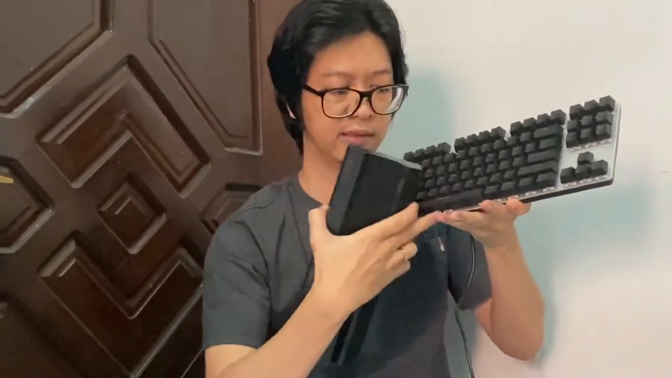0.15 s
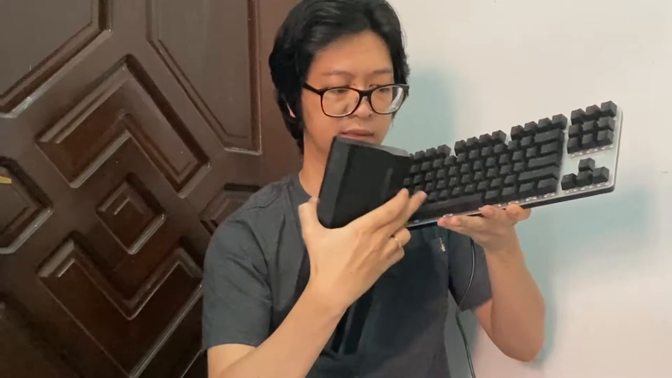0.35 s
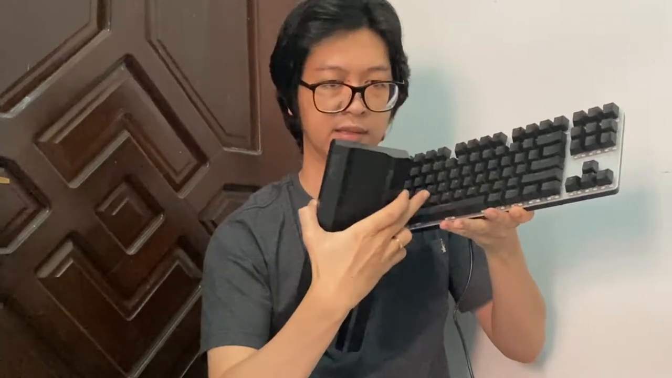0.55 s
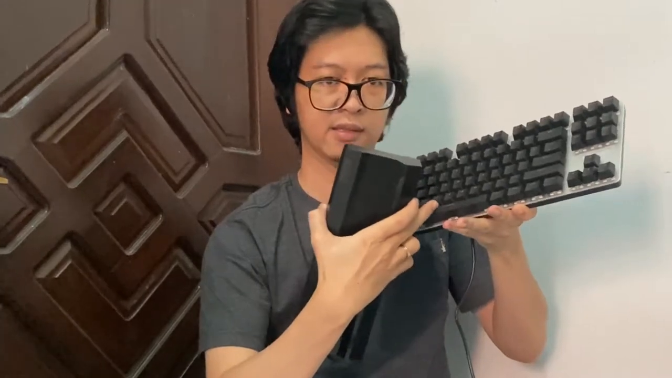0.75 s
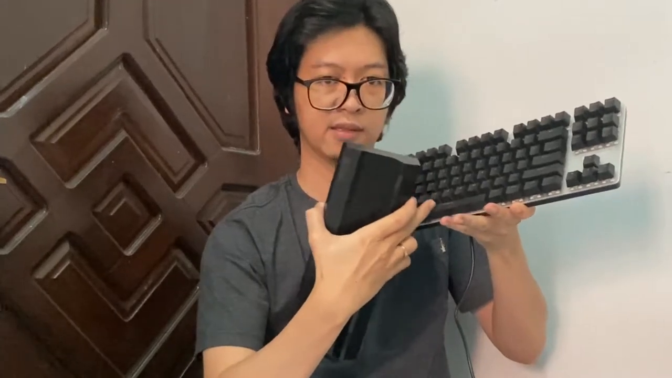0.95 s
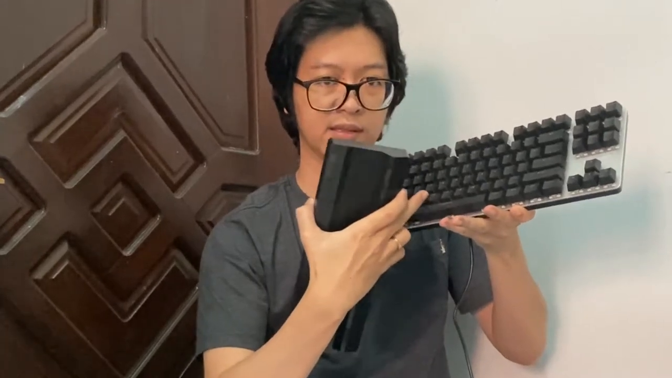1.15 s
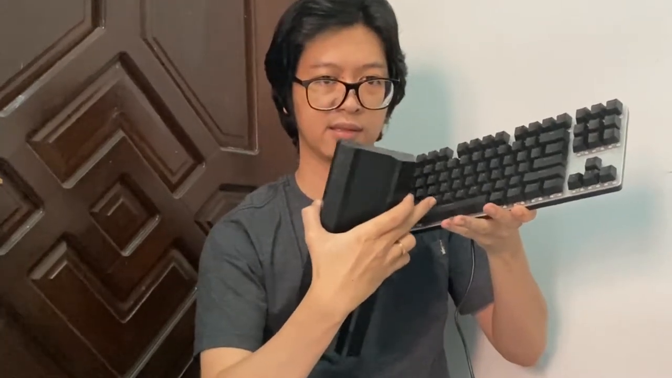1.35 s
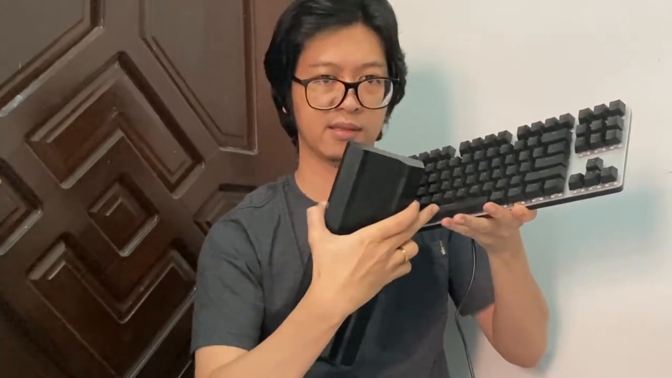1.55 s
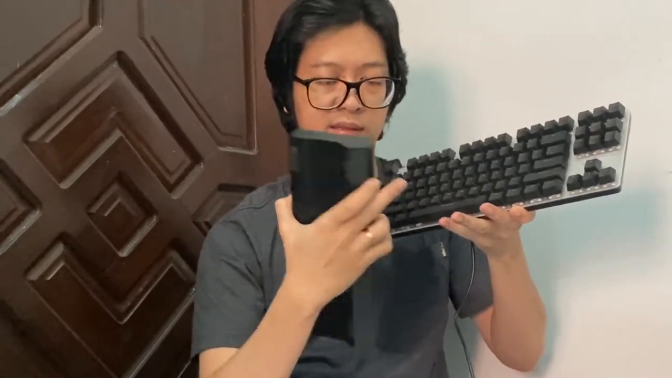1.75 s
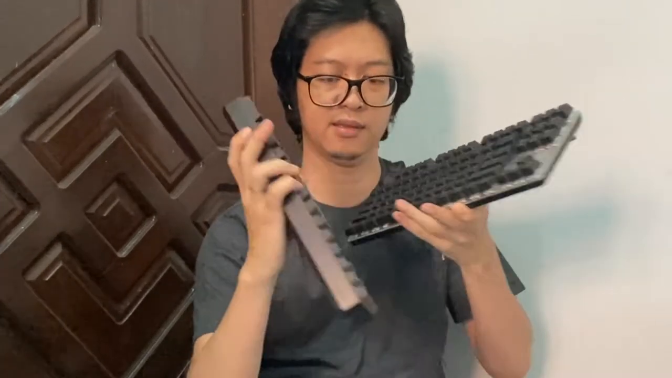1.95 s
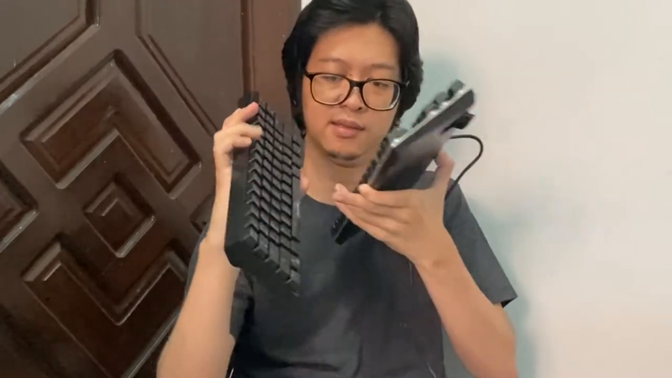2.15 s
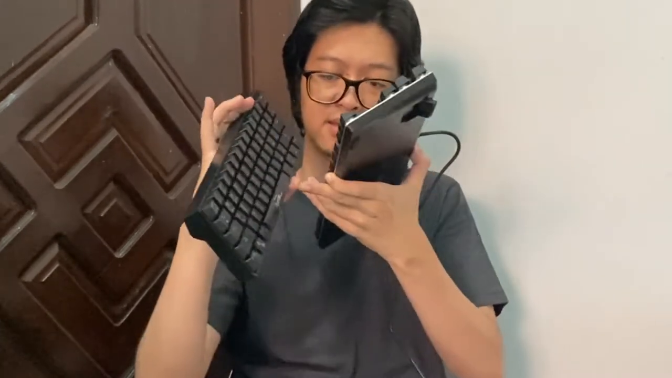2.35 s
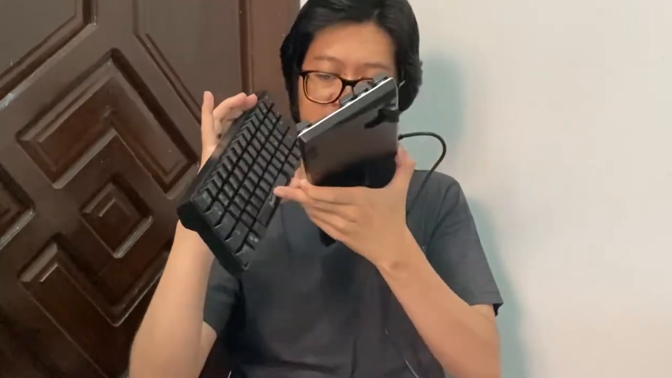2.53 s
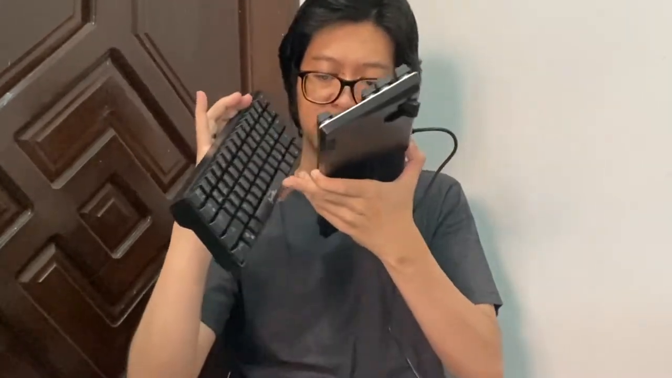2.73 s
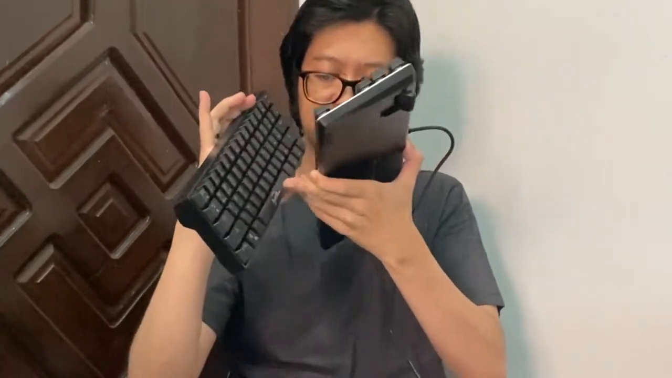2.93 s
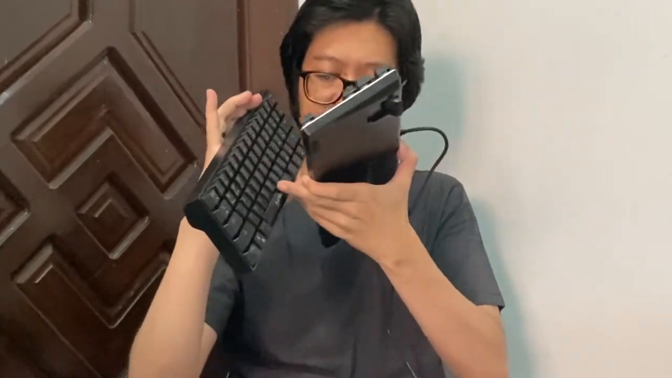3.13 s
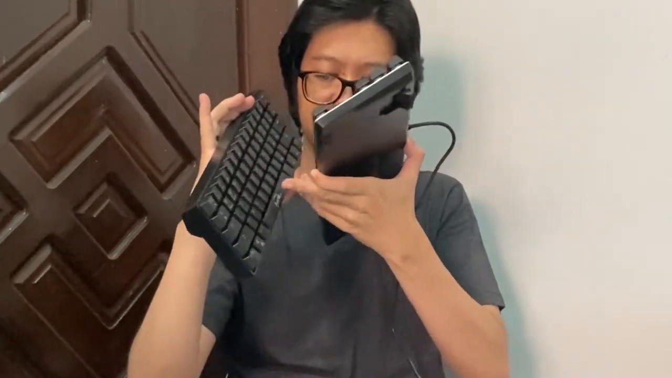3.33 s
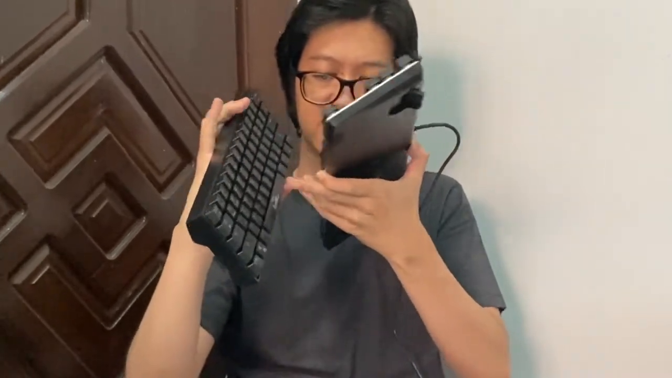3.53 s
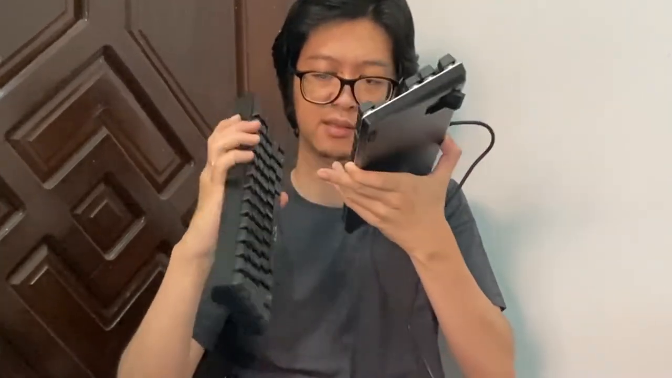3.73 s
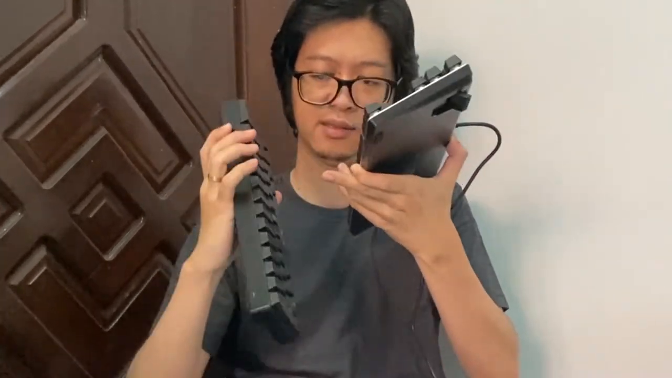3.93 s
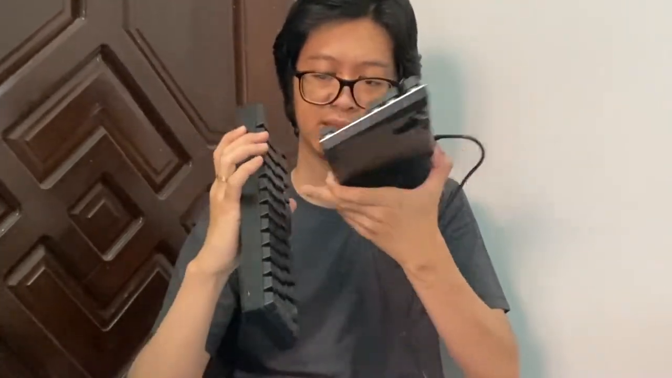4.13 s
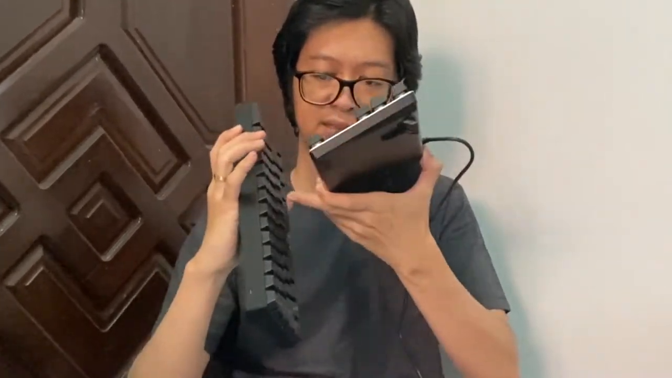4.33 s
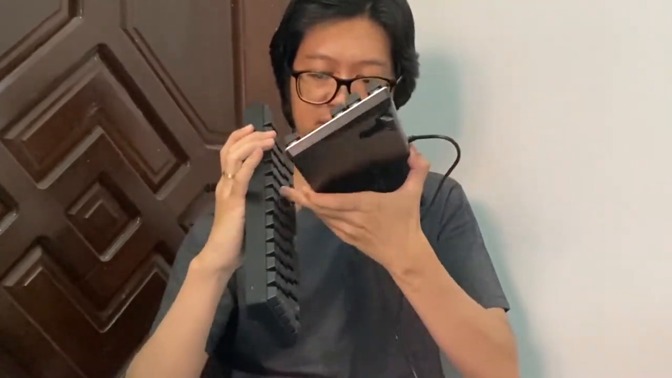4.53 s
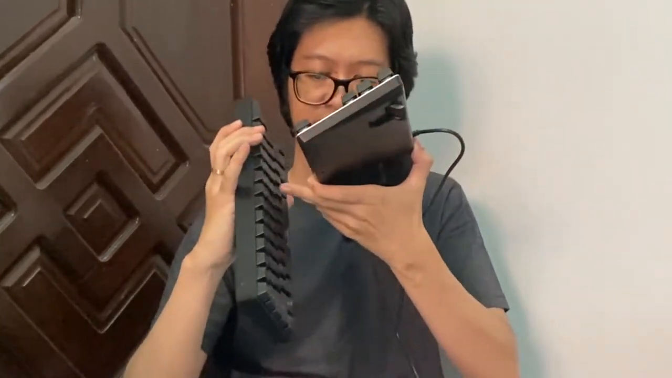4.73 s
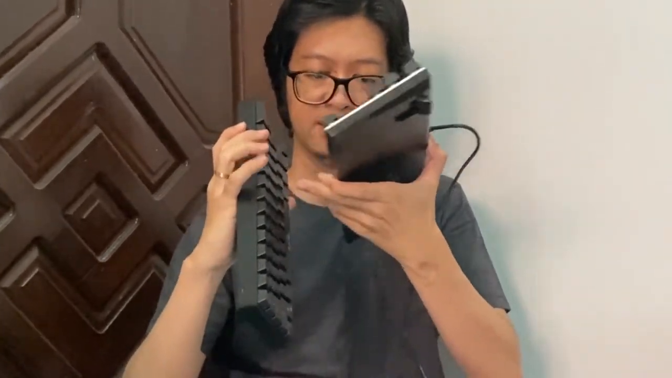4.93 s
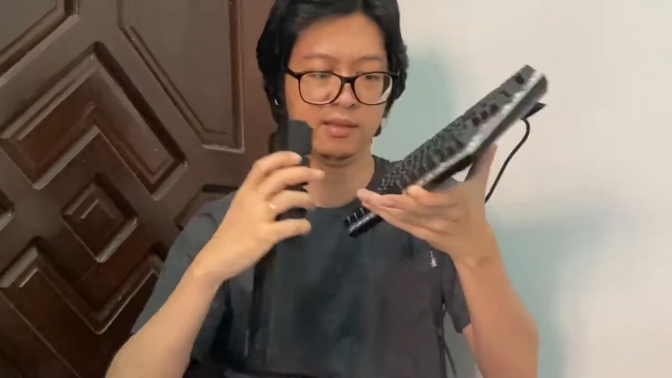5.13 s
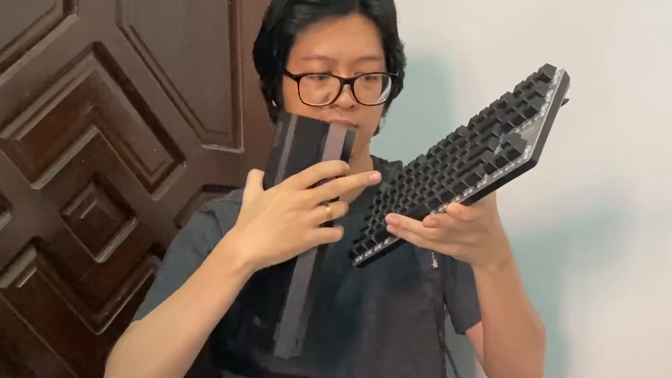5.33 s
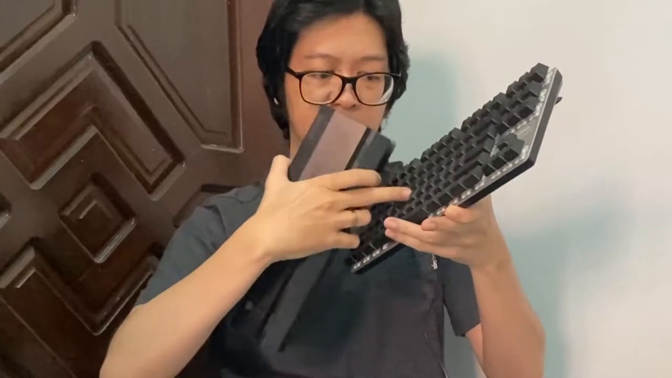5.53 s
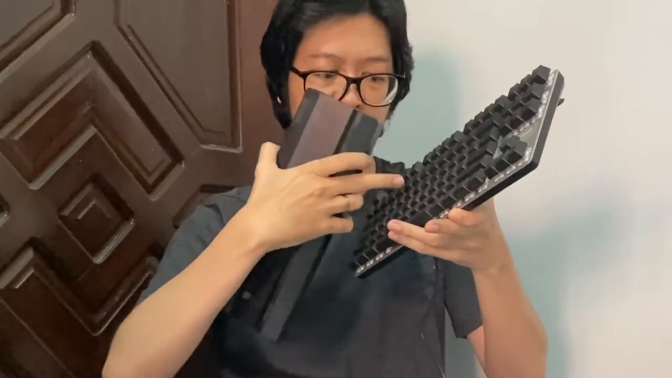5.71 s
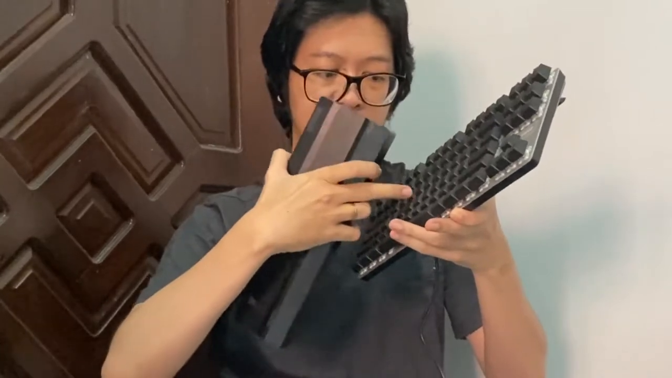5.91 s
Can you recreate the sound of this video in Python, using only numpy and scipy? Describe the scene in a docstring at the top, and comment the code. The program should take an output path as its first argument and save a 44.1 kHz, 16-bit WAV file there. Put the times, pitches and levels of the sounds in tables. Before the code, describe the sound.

Two mechanical keyboards are tried in turn, held near a stereo microphone in a small hard-walled room. Bright, sharp clicks come first at a steady pace, then clicks of a woodier, heavier colour, then a return to another grip with further clacks and light handling bumps. Every press has a down-click and a softer up-clack. Quiet hiss lies behind, and a low wavering hum swells in the second half.

```python
"""Two mechanical keyboards

Someone holds two mechanical keyboards in a small, hard-walled room and presses clicky keys, about three a second.
Each stroke is a faint keycap rattle, the snap of the switch and its landing, then a faint tick and a duller clack
as the key springs back: noise bursts and impulses filtered by case resonances, with plate tones, echoes and a tail.
Soft bumps and short tones come between, and a band-shaped dip glides up through the middle frequencies and back.
Behind lie filtered-noise hiss and a low, wavering hum that swells in the second half."""
import sys
import numpy as np
from scipy import signal
from scipy.fft import rfft, irfft
from scipy.io import wavfile
from scipy.ndimage import uniform_filter1d

SR = 44100
rng = np.random.default_rng(int(sys.argv[2]) if len(sys.argv) > 2 else 0)


def inscribe(sig):
    """Save sig as 16-bit PCM at rate SR to the path in sys.argv[1].

    A 1-D sig is mono; a 2-D sig holds one channel per row.
    Samples are clipped to [-1, 1] before scaling.
    """
    pcm = np.round(np.clip(np.atleast_2d(sig).T, -1, 1) * 32767)
    wavfile.write(sys.argv[1], SR, pcm.astype(np.int16))


N = 263277

# Thud, knock, clack and click bands of an impact: the heavy case answers later than the switch.
# Each row: upper edge in Hz (the last band is open), lag in seconds, decay in seconds before the blow's
# length factor, room level in dB.
BANDS = [(831, 0.00091, 0.004, -6.5), (2012, 0.00119, 0.0066, -9.5), (4970, 0.00038, 0.0041, -8),
         (20000, 0.0001162, 0.0054, -14)]


def gain_of(db):
    """Level law: 20 dB is a tenfold amplitude."""
    return 10 ** (np.asarray(db) / 20)


def evened(x):
    """Power normalisation: scales to an rms of one."""
    return x / np.sqrt(np.mean(x ** 2) + 1e-20)


def read(points, hz):
    """Interpolation along log frequency, the scale on which pitch is heard."""
    f, value = np.transpose(points)
    return np.interp(np.log(hz + 1), np.log(np.abs(f) + 1), value)


def follow(points):
    """Amplitude envelope: a level curve in dB becomes a gain for every sample."""
    return gain_of(np.interp(np.arange(N) / SR, *np.transpose(points)))


def smooth_noise(window):
    """Slow random fluctuation: white noise averaged twice over a window in samples, with an rms of one."""
    once = uniform_filter1d(rng.standard_normal(N), size=window)
    return evened(uniform_filter1d(once, size=window))


def add(mix, s, sound):
    """Superposition: sums a stereo sound into the mix at s seconds."""
    start = round(s * SR)
    part = mix[:, max(start, 0):]
    sound = sound[:, max(-start, 0):]
    part[:, :sound.shape[1]] += sound[:, :part.shape[1]]


def diffuse(size):
    """Diffuse-field coherence: spectra of white noise as two nearby microphones hear it."""
    # Likeness of the two channels. Each row: frequency in Hz, coherence from 0 to 1.
    likeness = [(60, 0.94), (250, 0.74), (600, 0.21), (1200, 0.087), (2500, 0.4), (5500, 0.59), (8500, 1),
                (15000, 0.35)]
    left, other = rfft(rng.standard_normal((2, size)))
    same = np.clip(read(likeness, np.fft.rfftfreq(size, 1 / SR)), -1, 1)
    right = same * left + np.sqrt(1 - same ** 2) * other
    return np.array([left, right])


def background(spectrum):
    """Spectral shaping: diffuse white noise filtered to the given colour, with an rms of one."""
    colour = gain_of(read(spectrum, np.fft.rfftfreq(N, 1 / SR)))
    return evened(irfft(diffuse(N) * colour, N))


def hiss(flutter_db=-2.0):
    """Coloured noise with random amplitude modulation: quiet room hiss, never quite steady."""
    # Colour of the hiss. Each row: frequency in Hz, level in dB.
    hiss_colour = [(25, -16.5), (50, -4), (100, 3), (200, -3), (400, -9), (800, -14), (1250, -13),
                   (2000, -19.5), (4000, -23), (8000, -27.5), (12000, -27), (16000, -40.5)]
    # Level of the hiss. Each row: time in seconds, level in dB.
    hiss_level = [(0, -54), (.2, -58.5), (1.9, -58.5), (2.25, -62), (2.6, -61), (4.1, -57), (5.97, -55)]
    flutter = gain_of(flutter_db * smooth_noise(2000))
    return follow(hiss_level) * flutter * background(hiss_colour)


def hum(hz=57, waver_hz=3.5, octave_db=-18, rumble_db=-7):
    """Frequency modulation: a low, randomly wavering tone with its octave, wrapped in noise rumble."""
    # Colour of the rumble. Each row: frequency in Hz, level in dB.
    rumble_colour = [(25, -24), (40, -6.5), (52, 6), (70, -5), (90, 4.5), (105, -8), (125, -10),
                     (160, -21.5), (260, -21.5), (500, -64)]
    # Level curve of the hum. Each row: time in seconds, level in dB before the scene's mix gain.
    hum_level = [(0.0, -41.5), (0.08, -59), (0.46, -50.5), (0.7, -72), (1.53, -77), (1.56, -52),
                 (1.71, -77.5), (2.74, -76), (2.81, -61), (3.27, -54), (3.57, -36), (3.62, -47),
                 (3.77, -36), (3.82, -57), (3.94, -44), (4.06, -51.5), (4.26, -32.5), (4.36, -41),
                 (4.46, -35.5), (5.19, -51), (5.4, -35.5), (5.55, -46.5), (5.92, -40), (5.97, -47)]
    angle = 2 * np.pi * np.cumsum(hz + waver_hz * smooth_noise(3000)) / SR
    tone = evened(np.sin(angle) + gain_of(octave_db) * np.sin(2 * angle))
    return evened(tone + gain_of(rumble_db) * background(rumble_colour)) * follow(hum_level)


def room_tail(spectrum, t, build_s=0.0032, clump_db=1.0):
    """Reverberation: clumped reflections build up quickly and die exponentially at each frequency's own rate."""
    # Room decay. Each row: frequency in Hz, time to fall by 60 dB in seconds.
    room_decay = [(250, 0.46), (500, 0.45), (800, 0.34), (1300, 0.34), (2500, 0.31), (6000, 0.35),
                  (15000, 0.26)]
    hz, at, z = signal.stft(irfft(spectrum), SR, nperseg=512)
    z = z * gain_of(-60 * np.maximum(at + t[0], 0) / read(room_decay, hz)[:, None])
    tail = signal.istft(z, SR, nperseg=512)[1][:, :len(t)]
    clumps = gain_of(clump_db * evened(uniform_filter1d(rng.standard_normal(len(t)), size=110)))
    build_up = 1 - np.exp(-np.maximum(t, 0) / build_s)
    return tail * evened(clumps) * build_up


def hollowed(x):
    """Time-varying filtering: a band-shaped dip glides up through the middle frequencies and back down."""
    # Path of the dip. Each row: time in seconds, centre in Hz, depth in dB (negative is a boost),
    # half-width in octaves.
    dip_path = [(1.15, 624, -8, 0.45), (1.42, 700, 12.5, 0.31), (1.7, 1160, -4, 0.53),
                (1.83, 1700, 33, 0.46), (1.96, 1710, 15, 0.27), (2.219, 2020, 18, 0.82),
                (2.42, 1690, 9, .33), (2.72, 650, 1, 0.18)]
    hz, t, z = signal.stft(x, SR, nperseg=512)
    s, *columns = np.transpose(dip_path)
    centre, depth, octaves = (np.interp(t, s, column) for column in columns)
    away = np.log2((hz[:, None] + 1) / centre) / octaves
    z = z * gain_of(-depth * np.exp(-away ** 4))
    return signal.istft(z, SR, nperseg=512)[1][:, :N]


def rings(swell_s=0.0043):
    """Damped modes: softly started, dying tones that ring after bumps and after one key release."""
    # Each row: start in seconds, frequency in Hz, level in dB, time to fall by 60 dB in seconds.
    ring_tones = [(0.093, 394, -32, 0.16), (.093, 2050, -31.5, 0.061), (0.131, 330, -27.5, 0.11),
                  (1.862, 1411, -24.5, 0.09), (1.862, 952, -31, 0.083), (2.413, 1320, -34, 0.07),
                  (2.437, 2920, -31, 0.044)]
    out = np.zeros((2, N))
    t = np.arange(SR // 2) / SR
    for s, hz, db, t60 in ring_tones:
        envelope = gain_of(db - 60 * t / t60) * (1 - np.exp(-t / swell_s))
        tone = envelope * np.sin(2 * np.pi * hz * t)
        add(out, s, np.array([tone, tone]))
    return out


def plate(modes, t, swell_s=0.0037):
    """Modal decay: long, dying sine tones of the switch plate, each at a random phase."""
    t = np.maximum(t, 0)
    tones = sum(gain_of(db - 60 * t / t60) * np.sin(2 * np.pi * (hz * t + rng.random()))
                for hz, db, t60 in modes)
    return np.array([tones, tones]) * (1 - np.exp(-t / swell_s))


def keycap(hz, ripple_db=3.5, spacing_hz=75):
    """Small local resonances: a random spectral ripple, drawn afresh for every blow."""
    knots = rng.standard_normal(1024)
    ripple = np.interp(hz / spacing_hz, np.arange(len(knots)), knots)
    return evened(gain_of(ripple_db * ripple))


def keyboard(colour, case, hz):
    """Resonant radiation: one keyboard's response, split into the four bands, each of unit power."""
    peaks = sum((gain_of(db) ** 2 - 1) / (1 + (2 * (hz - f) / width) ** 2) ** 2 for f, width, db in case)
    body = gain_of(read(colour, hz)) * np.sqrt(np.maximum(1 + peaks, 1e-3))
    body = body / np.sqrt(1 + (230 / (hz + 1)) ** 6)  # a small case radiates little bass
    below = [1 / (1 + (hz / band[0]) ** 12) for band in BANDS[:-1]]
    shares = np.diff([0 * hz, *below, 1 + 0 * hz], axis=0)  # power share of each band
    return np.array([evened(body * np.sqrt(np.abs(share))) for share in shares])


def contact(bands, levels, t, length, rise, snap=.75, spread=.45, size=4096):
    """Impact excitation: a sharp impulse amid brief plastic chatter; the treble comes first, the case follows."""
    coarse = bands[:, ::len(t) // size]  # the response on the short burst's frequency grid
    t = t[:size]
    hz = np.fft.rfftfreq(size, 1 / SR)
    chatter = rfft(rng.standard_normal(size)) + spread * diffuse(size)
    turn = rng.random()  # phase of the impulse, in turns
    out = np.zeros((2, size))
    for band, db, (_, lag, decay, _) in zip(coarse, levels, BANDS):
        u = (t - lag) / (decay * length)
        shape = np.exp(np.minimum(u / rise, -u))  # exponential rise, then exponential fall
        impact = irfft(band * np.exp(2j * np.pi * (turn - hz * (lag - t[0]))))
        sound = evened(irfft(chatter * band) * shape) + snap * evened(impact * shape)
        out += gain_of(db) * evened(sound) * np.sqrt(np.mean(shape ** 2))
    return out


def blows(times, strengths_db, voice, direct_db, room_db, length, rise, bright_db=0, wet_db=0, size=24576):
    """Source-filter principle: each blow rings the keyboard in hand; walls answer with echoes and a dense tail."""
    # Times in seconds at which a new grip changes the sound.
    new_grips = [2.6, 4.2, 5.25]
    # Keycap colour in each grip. Each row: frequency in Hz, level in dB.
    colours = [[(200,-29),(350,-26),(500,-11.5),(750,-12.5),(1400,4.5),(2400,8),(3400,6.5),(4200,5.5),(5500,-5.5),(8000,-3.5),(10500,-0.5),(15800,-2)], [(200,-6),(350,-6.5),(600,-2.5),(900,-8.5),(1400,-4.5),(2400,-4),(3400,-11.5),(4200,-13),(5500,-10),(8000,-2.5),(10500,-5),(15800,-4)], [(200,-17),(350,-21),(600,-18),(900,-2.5),(1400,7),(2400,-3),(3400,-5),(4200,-16),(5500,-22.5),(8000,-17.5),(10500,-24.5),(15800,-33)], [(200,-8.5),(350,-7),(600,-0.5),(900,9.5),(1400,13.5),(2400,2.5),(3400,-4),(4200,-12),(5500,-21.5),(8000,-9),(11000,-17.5),(15800,-26.5)]]
    # Case, plate and spring resonances in each grip. Each row: frequency in Hz, width in Hz, height in dB.
    cases = [[(441, 11, 3.9), (959, 59, 14.2), (1410, 34, 6), (2245, 43, 9.3), (4000, 170, 2.9),
              (8290, 1700, 7.9), (8630, 110, 10)], [(653, 81, 10.5), (1165, 40, 13.2), (2550, 140, 10.6), (2760, 58, 5.2),
                              (5060, 300, 1.8), (7270, 150, 4.3), (8960, 43, 2.3)], [(647, 79, 17.3), (1208, 84, 10.7), (1332, 24, 11),
                                              (2350, 190, 6.1), (2670, 470, 7.1), (7630, 1300, 5.1)], [(483, 58, 6.5), (588, 35, 9.5),
                                                              (980, 69, 7.3), (1317, 150, 8.5),
                                                              (1825, 39, 2), (2200, 45, 2),
                                                              (8780, 170, 12.2)]]
    # Plate tones, one list for each grip. Each row: frequency in Hz, level in dB against the thud setting,
    # time to fall by 60 dB in seconds.
    plate_modes = [
        [(483, -11, 0.37), (597, -21, 0.13)],
        [(353.4, -14.5, 0.34), (413.4, -16.5, 0.21), (638, -14, 0.37)],
        [(1193, 0, 0.12), (1370, -22, 0.66)],
        [(1420, -13.5, 0.18)],
    ]
    # Single echoes from nearby walls. Each row: delay in seconds before a small random shift, level in dB.
    wall_echoes = [(.0062, -11), (0.0117, -10.5), (0.0412, -19.5)]
    # Share of the room in each grip, in dB, as the keys face towards or away from the microphone.
    grip_room_db = [-.5, 0.57, -1.55, -1.7]
    hz = np.fft.rfftfreq(size, 1 / SR)
    t = np.arange(size) / SR - .012  # seconds from the blow, with room for its rise
    grips = [keyboard(colour, case, hz) for colour, case in zip(colours, cases)]
    out = np.zeros((2, N))
    for s, strength, bright, wet in np.broadcast(times, strengths_db, bright_db, wet_db):
        grip = np.searchsorted(new_grips, s)
        tilt = bright * np.linspace(-.5, .5, len(BANDS))
        levels = np.add(voice[grip % len(voice)], strength + tilt)
        bands = grips[grip] * keycap(hz)
        start = s + t[0]
        direct = gain_of(direct_db) * contact(bands, levels, t, length, rise)
        add(out, start, direct)
        for delay, db in wall_echoes:  # each echo's delay varies slightly at random; echoes swap channels
            add(out, start + delay + rng.uniform(-0.0011, .001), gain_of(db) * direct[::-1])
        add(out, start, gain_of(levels[0]) * plate(plate_modes[grip], t))
        sent = gain_of(levels + [band[3] for band in BANDS] + room_db + grip_room_db[grip] + wet)
        add(out, start, room_tail(diffuse(size) * np.sqrt(sent ** 2 @ bands ** 2), t))
    return out


def handling():
    """Slow-rising impacts: soft bumps of hands and cases, a finger brushing a keycap, a small bright switch tick."""
    # Each row: time in seconds, strength in dB, brightness in dB from thud to click.
    soft_contacts = [(0.005, 0, 13), (0.091, 1.5, -2), (2.412, -3.5, -2), (2.438, 1, 11), (5.279, 0.5, -11),
                     (5.59, -2.5, -16), (5.627, -7.5, -4), (5.759, 1.5, 27), (5.927, -8.5, 37)]
    # Excitation of the bands. The row: thud, knock, clack and click levels in dB.
    soft_voice = [(-50, -37.5, -44.5, -46)]
    s, db, bright_db = np.transpose(soft_contacts)
    return blows(s, db, soft_voice, direct_db=-6, room_db=1.5, length=1.0, rise=0.69, bright_db=bright_db)


def keystrokes():
    """Successive impacts: finger rattles cap, switch snaps, key lands; then the switch resets, key springs back."""
    # Keys going down. Each row: click time in seconds, finger's lead on it in seconds, landing's lag behind it
    # in seconds, touch, click and landing strengths in dB, brightness in dB from thud to click.
    presses = [(0.354, .004, .008, 4, -1.5, -1, 0.5), (0.657, .008, .005, -2.5, -2, 7.5, 0),
               (0.935, 0.006, .006, -3, -0.5, -3, -2), (1.2244, 0.0097, .006, -2.5, 1, -0.5, -0.5),
               (1.5016, .009, .007, -4.5, -0.5, -5, 2.5), (1.762, 0.011, 0.009, -11, -2, -19, 5),
               (2.750, 0.015, 0.0046, -5, -5, 1, 3), (3.061, .010, 0.0018, 3, 0.5, 3.5, -3.5),
               (3.366, .013, 0.0029, 2, 1.5, -0.5, -3.5), (3.643, 0.014, .006, -0.5, 1.5, 0, -3),
               (4.463, 0.0041, .0015, 6, 5, 0, -1), (4.787, .009, .003, 1, -3.5, -2.5, 0.5),
               (5.061, .014, .004, -6.5, 1.5, -4.5, 0), (5.319, 0.017, .006, -20.5, -2, -19.5, 3),
               (5.787, .006, .005, 2, -1.5, 2, 2)]
    # Keys springing back against their top stop. Each row: time in seconds, strength in dB,
    # brightness in dB from thud to click, room in dB (for the spring-back alone).
    releases = [(0.3962, 2, -9, 0), (0.744, 0.5, -3.5, -0.5), (1.024, 1, -4.5, -1), (1.315, 0.5, -1, -1),
                (1.591, -4.5, 4, 0.5), (1.860, -7.5, 7, 0.5), (2.849, -0.5, 3.5, 2), (3.159, -6, -8.5, 2.5),
                (3.465, 0.5, -2.5, -1.5), (3.749, 2, 2, 0), (4.547, 0, 1, 5), (4.887, -4.5, -5, 0),
                (5.139, 1.5, -1, -1.5), (5.408, 0, -9.5, -6), (5.855, 1.5, 0.5, 4)]
    # Excitation of the bands by each kind of blow. Each row: thud, knock, clack and click levels in dB;
    # four rows are one for each grip, a single row serves all.
    touch_voice = [(-46.5, -33, -28, -26)]
    click_voice = [(-42.5, -39, -14, -4.5), (-50.5, -18, -43, -9), (-54, -47, -37.5, -19),
                   (-56, -30, -25, -11)]
    landing_voice = [(-32.5, -18.5, -16.5, -9.5), (-29, -16, -11.5, -8), (-24, -11.5, -6, -14.5),
                     (-23, -38, -10.5, -19.5)]
    reset_voice = [(-59.5, -47.5, -31.5, -26.5)]
    release_voice = [(-29.5, -13, -14.5, -5.5), (-26, -13.5, -18.5, -20), (-29, -18, -27, -25.5),
                     (-36, -26, -28, -29.5)]
    reset_lead_s = .018  # the switch resets with a faint tick just before the release
    click, lead, lag, touch_db, click_db, landing_db, tone_db = np.transpose(presses)
    release, release_db, bright_db, wet_db = np.transpose(releases)
    touches = blows(click - lead, touch_db, touch_voice, direct_db=-4, room_db=6.5,
                    length=1.0, rise=0.34, bright_db=tone_db)
    clicks = blows(click, click_db, click_voice, direct_db=-6.5, room_db=-3.5,
                   length=.8, rise=0.12, bright_db=tone_db)
    landings = blows(click + lag, landing_db, landing_voice, direct_db=-5.5, room_db=-3.5,
                     length=0.63, rise=0.18, bright_db=tone_db)
    resets = blows(release - reset_lead_s, release_db, reset_voice, direct_db=-4.5, room_db=-7.5,
                   length=1.0, rise=0.28, bright_db=bright_db)
    returns = blows(release, release_db, release_voice, direct_db=-4.5, room_db=-1,
                    length=0.85, rise=0.5, bright_db=bright_db, wet_db=wet_db)
    return touches + clicks + landings + resets + returns


def scene():
    """Superposition: keys, handling and hiss pass through the gliding dip; ring tones and hum join them."""
    return hollowed(keystrokes() + handling() + hiss()) + rings() + gain_of(0.5) * hum()


def record(dry):
    """Interchannel level and phase differences of two microphones, then a low-pass band limit."""
    # Left microphone over right. Each row: frequency in Hz, level difference in dB.
    left_over_right = [(60, 1.5), (500, 0.7), (1000, 0.6), (2000, 1), (4500, 3.5), (8000, 1), (15000, -0.5)]
    # Phase lead of the left microphone, tapered below 2 kHz. Each row: frequency in Hz,
    # phase in radians before the taper.
    left_lead = [(0, 0), (2150, .55), (4500, .65), (6700, .35), (7500, -.6), (8500, -2.5), (9500, -3.7),
                 (11400, -6.5), (13400, -9.4), (16500, -13.2)]
    edge_hz = 16300
    hz = np.fft.rfftfreq(N, 1 / SR)
    lag = np.exp(-1j * read(left_lead, hz) * np.minimum(hz / 2000, 1))
    lean = gain_of(read(left_over_right, hz) / 2)  # half the difference on each side
    pair = np.clip(irfft(rfft(dry) * np.array([lean, lag / lean]), N), -1, 1)
    low_pass = signal.firwin(511, edge_hz, window=("kaiser", 9), fs=SR)
    return signal.oaconvolve(pair, low_pass[None], "same", axes=1)


dry = scene()
out = record(dry)
inscribe(out)
```